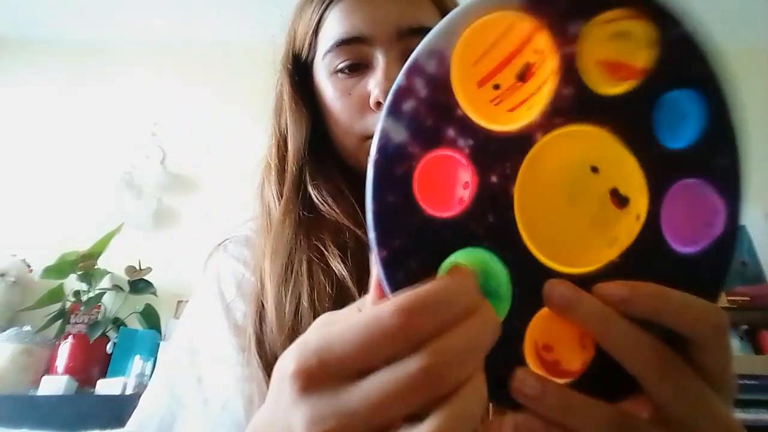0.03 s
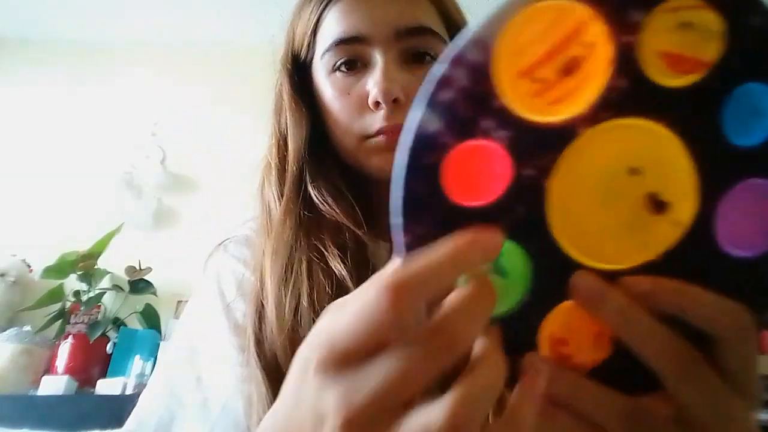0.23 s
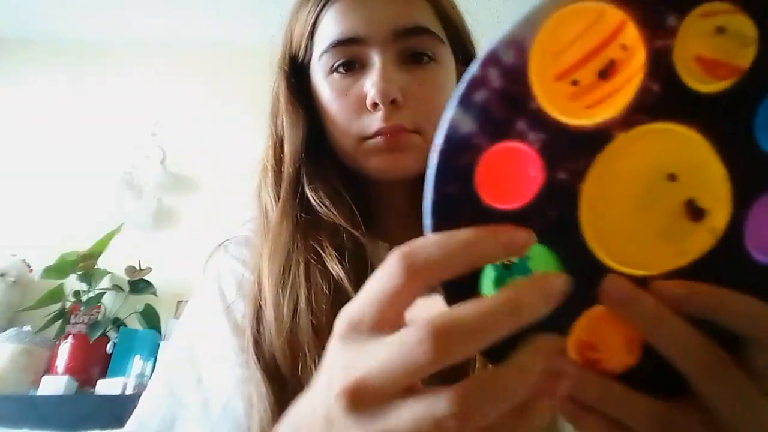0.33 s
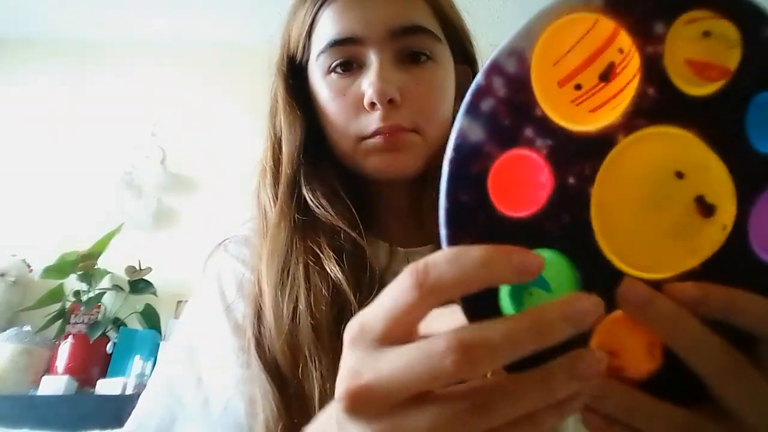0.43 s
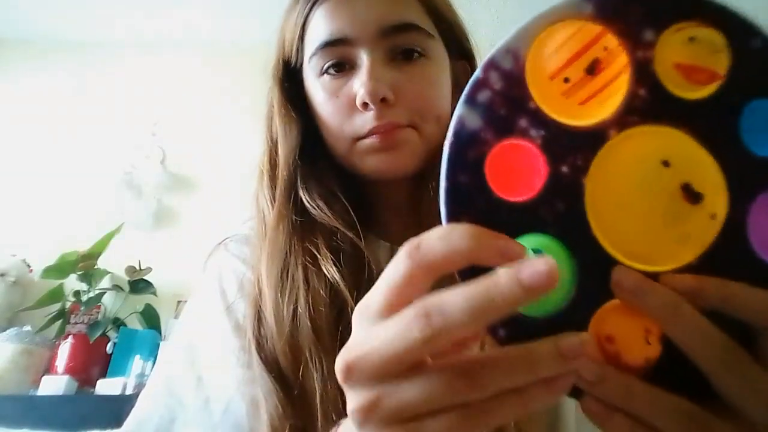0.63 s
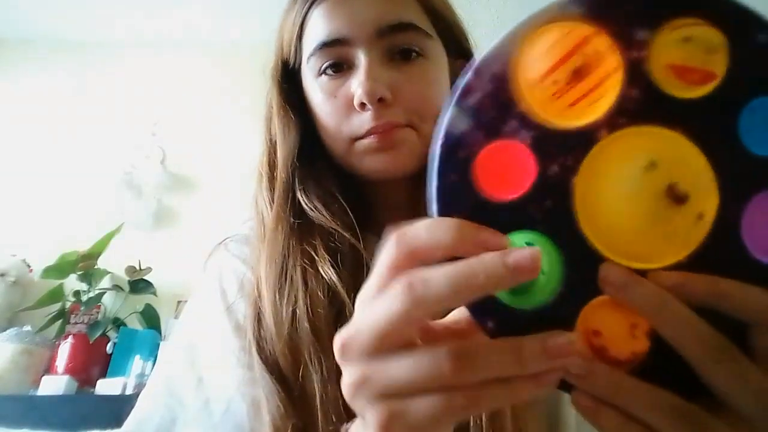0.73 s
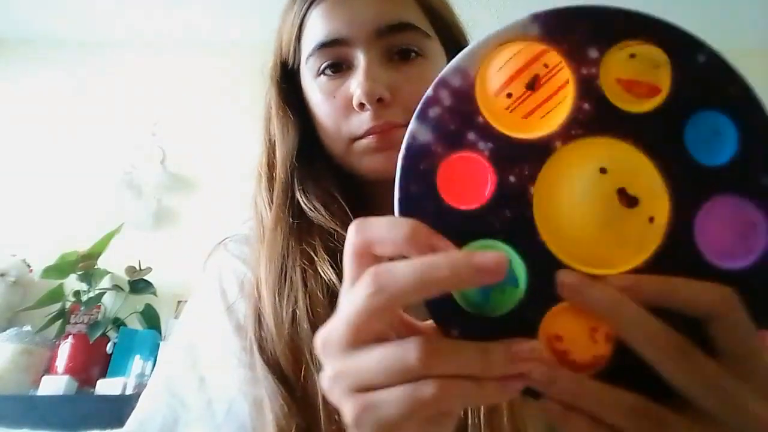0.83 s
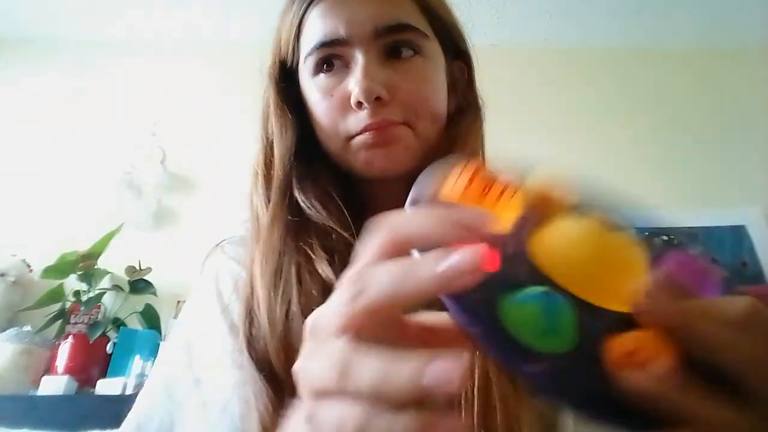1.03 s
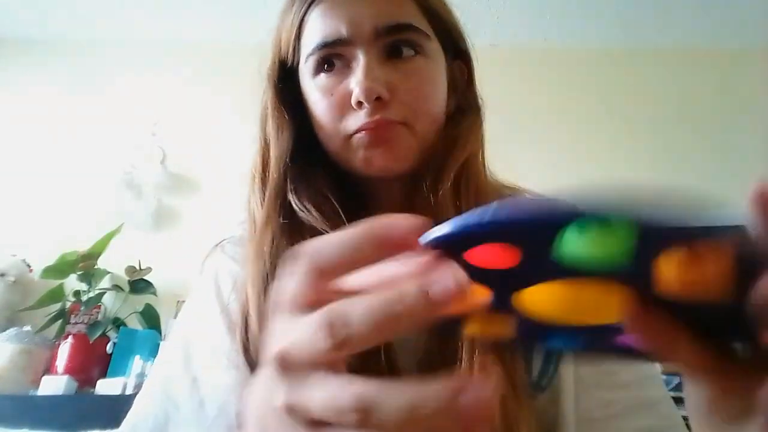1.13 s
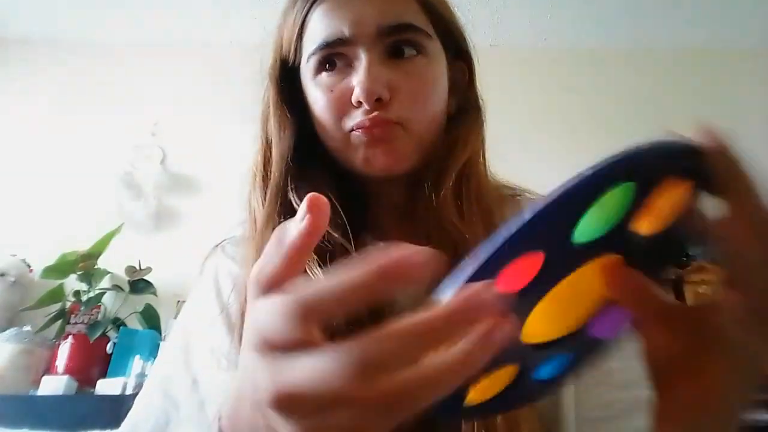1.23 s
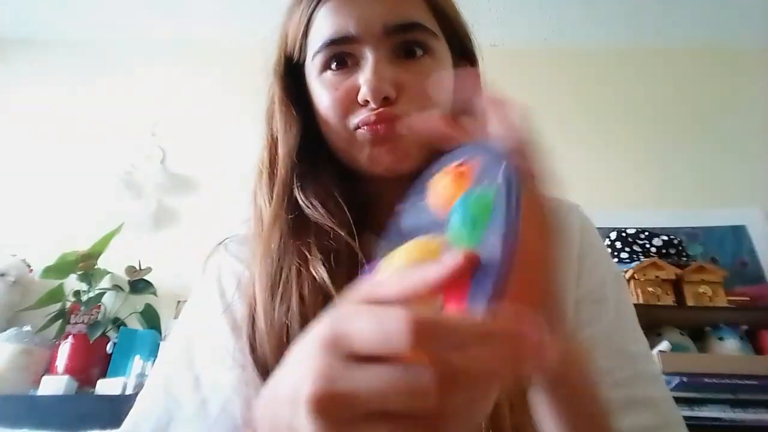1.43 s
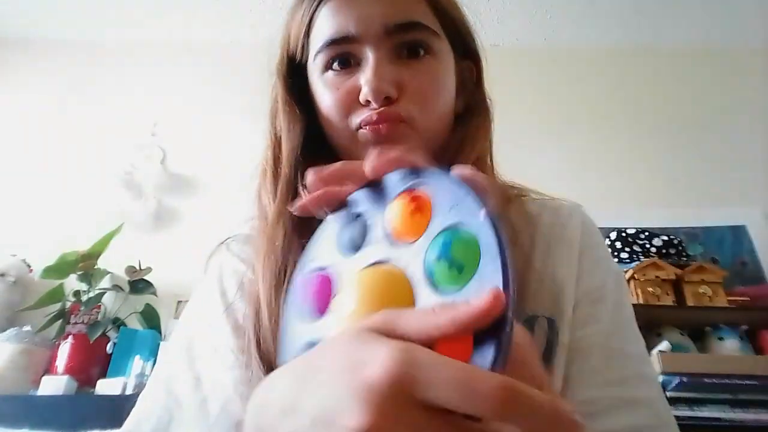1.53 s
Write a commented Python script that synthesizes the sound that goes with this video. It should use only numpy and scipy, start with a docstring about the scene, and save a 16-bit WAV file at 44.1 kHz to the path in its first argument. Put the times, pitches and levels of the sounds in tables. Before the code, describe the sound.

One fidget toy bubble pops up close, followed by soft tapping and sliding fingers.

```python
"""One silicone bubble of a fidget board pops, close to a small microphone in a quiet room.
The pressed dome buckles, then snaps through, ringing the board and the air in the hollow beneath.
At this distance the pop just overloads the microphone; desk and walls answer briefly.
Fingers touch the board just before the pop, then tap and slide on it as it is turned over.
A low hum and a faint hiss lie under it all."""
import sys
import numpy as np
from scipy import signal
from scipy.fft import rfft, irfft
from scipy.io import wavfile

SR = 44100
rng = np.random.default_rng(int(sys.argv[2]) if len(sys.argv) > 2 else 0)


def materialize(psi):
    """Save the field psi as 16-bit PCM at rate SR to the path in sys.argv[1].

    A 1-D psi becomes a single channel; in a 2-D psi each row is a channel.
    """
    bounded = np.clip(np.atleast_2d(psi).T, -1, 1)
    quanta = np.round(bounded * 32767).astype(np.int16)
    wavfile.write(sys.argv[1], SR, quanta)


N = 70560

# modes of dome and board: (frequency [Hz], relative level [dB], t60 [s])
BOARD_MODES = [(873, -26.5, 0.022), (1151, 7.5, 0.0059), (1677, -8, .007), (2167, -4, .0042),
               (3075, -10.5, 0.007), (3534, -6, .006), (4343, -12.5, 0.0066), (5580, -12.5, 0.0055),
               (7197, -10, .0043), (7704, -22, 0.011), (8200, -22.5, .004)]
HAND_LOW_HZ, BOARD_LOW_HZ = 115, 450  # the hand-held board is too light for bass


def amp(db):
    """Decibels to gain."""
    return 10 ** (np.asarray(db) / 20)


def unit(x):
    """Scales to rms 1."""
    return x / np.sqrt(np.mean(x ** 2) + 1e-20)


def decay(t, t60):
    """Envelope that falls 60 dB in t60 seconds."""
    return np.exp(-np.log(1000) * t / t60)


def read(points, hz):
    """Reads a table on a log-frequency axis."""
    f, value = np.transpose(points)
    return np.interp(np.log(hz + 1), np.log(f + 1), value)


def add(mix, start_s, sound):
    """Mixes a sound in at a time."""
    part = mix[max(round(start_s * SR), 0):][:len(sound)]
    part += sound[:len(part)]


def cut(x, hz, kind):
    """Causal low-, high- or band-pass."""
    return signal.sosfilt(signal.butter(2, hz, kind, fs=SR, output="sos"), x)


def colour(x, points):
    """Gives a noise its spectrum."""
    return irfft(rfft(x) * amp(read(points, np.fft.rfftfreq(len(x), 1 / SR))), len(x))


def drift(hz):
    """Slow random motion of rms 1."""
    rolloff = np.exp(-(np.fft.rfftfreq(N, 1 / SR) / hz) ** 2)
    return unit(irfft(rfft(rng.standard_normal(N)) * rolloff, N))


def ring(modes, delay_s=0):
    """Damped modes, set going by a soft push after a delay."""
    rise_s = .00039  # the soft skin takes this long to get going
    t = np.maximum(np.arange(SR // 10) / SR - delay_s, 0)
    ringing = sum(amp(db) * decay(t, t60) * np.sin(2 * np.pi * hz * t) for hz, db, t60 in modes)
    return (1 - np.exp(-t / rise_s)) * ringing


def room_tone():
    """Still air, microphone hiss and a low hum that wavers in pitch and level."""
    # still air and microphone hiss: (frequency [Hz], relative density [dB])
    air_spectrum = [(25, -23), (60, -13.5), (85, -16.5), (120, -7), (200, -1), (285, -0.5), (400, -9),
                    (600, -16.5), (1000, -21), (1500, -24), (3000, -29), (7000, -31.5), (15800, -38.5)]
    # tones of the hum: (frequency [Hz], rms level [dB])
    hum_tones = [(119.5, -72), (176, -65), (240, -64.5), (272, -66)]
    waver, waver_hz, air_drift_db = .35, 6, .6
    t = np.arange(N) / SR
    air = unit(colour(rng.standard_normal(N), air_spectrum))
    air += cut(air, 1000, "lowpass") * (amp(air_drift_db * drift(waver_hz)) - 1)  # the lows flutter
    hum = np.zeros(N)
    for hz, db in hum_tones:
        tone = np.sin(2 * np.pi * (hz * t + rng.random()) + waver * drift(waver_hz))
        hum += amp(db) * unit(tone * (1 + waver * drift(waver_hz)))
    return amp(-60.7) * air + hum


def finger_taps():
    """Each touch thuds at a pitch set by its place, rings the board softly and may tick with a nail."""
    # fingers landing: (time [s], thud pitch [Hz], thud gain [dB], ring gain [dB], nail gain [dB])
    taps = [(0.1713, 192, -48, -72.5, -80), (0.184, 420, -32, -38, -48), (0.374, 398, -70, -64, -67),
            (0.393, 396, -66.5, -57, -65.5), (0.447, 600, -43.5, -58, -59), (0.4981, 400, -44, -48, -43),
            (0.5451, 450, -36, -58, -79.5), (0.5563, 300, -55.5, -60, -54), (0.564, 300, -44, -43.5, -59),
            (.665, 480, -34, -46, -56), (0.6686, 205, -31, -54, -75), (0.6724, 750, -41, -44, -73.5),
            (0.6835, 300, -72, -73, -52.5), (.7795, 400, -63, -49, -68), (0.7978, 360, -48.5, -58, -70),
            (0.8228, 400, -61.5, -46.5, -60.5), (0.8887, 400, -70, -61, -44), (.891, 400, -48, -35, -50),
            (.901, 403, -51, -42.5, -56), (1.3155, 253, -33.5, -54.5, -50), (1.3197, 470, -42, -53, -60),
            (1.454, 974, -35, -48, -51), (1.4561, 520, -45.5, -51.5, -38.5), (1.4585, 292.3, -34, -52, -63)]
    finger_hz = 1400  # a fingertip is soft: it rings mainly the lower modes
    thud_cycles = 7  # a thud dies away within this many cycles
    out, t = np.zeros(N), np.arange(SR // 10) / SR
    board = cut(ring(BOARD_MODES), (BOARD_LOW_HZ, finger_hz), "bandpass")
    for start_s, hz, thud_db, ring_db, nail_db in taps:
        thud = ring([(hz, thud_db, thud_cycles / hz)])
        nail = cut(rng.standard_normal(len(t)) * decay(t, t60=.012), (2200, 6145), "bandpass")
        add(out, start_s, thud + amp(ring_db) * board + amp(nail_db) * nail)
    return cut(out, HAND_LOW_HZ, "highpass")


def bubble_pop():
    """The dome gives way, then snaps through with a crack; the air beneath it moves against the skin."""
    # air in the hollow under the dome: (frequency [Hz], relative level [dB], t60 [s])
    hollow = [(405, -9, 0.025)]
    start_s, snap_after_s = .21565, .000786
    out, t = np.zeros(N), np.arange(SR // 10) / SR
    buckle = ring(BOARD_MODES) - ring(hollow)
    snap = ring(hollow, snap_after_s) - ring(BOARD_MODES, snap_after_s)
    # the crack is the many small, fast-dying modes of the plastic frame
    crack = cut(rng.standard_normal(len(t)) * decay(t, t60=.017), (3800, 8000), "bandpass")
    add(out, start_s, amp(-12) * buckle + snap)
    add(out, start_s + snap_after_s, amp(-17) * crack)
    return amp(.5) * cut(cut(out, 105, "highpass"), 11500, "lowpass")


def finger_slides():
    """Tiny slips of skin hiss and shake the board under a swelling stroke."""
    # skin sliding on the board: (start [s], length [s], hiss level [dB], ring level [dB])
    strokes = [(0.384, 0.032, -79, -62), (0.551, 0.029, -62, -65), (0.736, 0.0656, -75, -67),
               (0.821, 0.053, -66, -61), (1.086, 0.19, -69, -72), (1.187, .045, -68, -74),
               (1.36, .07, -76.5, -72), (1.41, 0.051, -62.5, -66), (1.547, 0.053, -71.5, -78)]
    # hiss of rubbing skin: (frequency [Hz], relative level [dB])
    skin_spectrum = [(300, -29), (1500, -11), (2500, -0.5), (3500, 1), (4500, 0.5), (5500, -1), (7300, -4),
                     (10000, -11.5), (16000, -36)]
    slips_per_s, spread_db = 3000, 2.5
    slips = rng.standard_normal(N) * (rng.random(N) < slips_per_s / SR)
    slips *= amp(spread_db * np.minimum(rng.exponential(1, N), 3))
    hiss = unit(colour(slips, skin_spectrum))
    shaken = signal.fftconvolve(slips, ring(BOARD_MODES))[:N]
    board = unit(cut(shaken, BOARD_LOW_HZ, "highpass"))
    out, t = np.zeros(N), np.arange(N) / SR
    for start_s, length_s, hiss_db, ring_db in strokes:
        swell = np.sin(np.pi * np.clip((t - start_s) / length_s, 0, 1))
        out += swell * (amp(hiss_db) * hiss + amp(ring_db) * board)
    return out


def room_reflections(direct):
    """Desk and walls send back a few clear reflections, dense early scatter and a short tail."""
    # first reflections from desk and walls: (delay [s], gain [dB])
    echoes = [(.0085, -28.5), (0.0136, -24), (0.0127, -22.5), (.0158, -30), (0.026, -33.5)]
    # colour of the room tail: (frequency [Hz], relative level [dB])
    tail_spectrum = [(100, -7.5), (400, 3), (650, -1.5), (950, 4), (1300, -3), (2300, 6.5), (3000, 3),
                     (3600, -2), (4500, -1.5), (5500, 3), (7500, 5.5), (10000, 6.5), (16000, -1.5)]
    # decay of the room: (frequency [Hz], t60 [s])
    tail_t60 = [(200, .25), (1000, .26), (4000, .28), (8000, .24), (14000, .18)]
    tail_db, tail_delay_s, scatter_db, scatter_s = -19, .0071, -1, .012
    response = np.zeros(SR // 2)
    hz, t, bands = signal.stft(rng.choice([-1., 1.], len(response)), SR, nperseg=256)
    bands *= amp(read(tail_spectrum, hz))[:, None] * decay(t, read(tail_t60, hz)[:, None])
    bands *= 1 + amp(scatter_db) * np.exp(-t / scatter_s)
    tail = signal.istft(bands, SR, nperseg=256)[1]
    add(response, tail_delay_s, amp(tail_db) * tail / np.linalg.norm(tail))
    for delay_s, db in echoes:
        add(response, delay_s, amp([db]))
    return signal.fftconvolve(direct, response)[:N]


def scene():
    """The board close to one microphone, with the quiet room behind it."""
    direct = bubble_pop() + finger_taps() + finger_slides()
    return (direct + room_reflections(direct) + room_tone())[None]


def record(dry):
    """The close microphone flattens the top of the pop; the treble ends at a steep band edge."""
    ceiling, edge_hz = .73, 16000
    clipped = dry / (1 + (dry / ceiling) ** 8) ** (1 / 8)
    lowpass = signal.firwin(511, edge_hz, window=("kaiser", 9), fs=SR)
    return signal.oaconvolve(clipped, lowpass[None], "same")


dry = scene()
out = record(dry)
materialize(out)
```